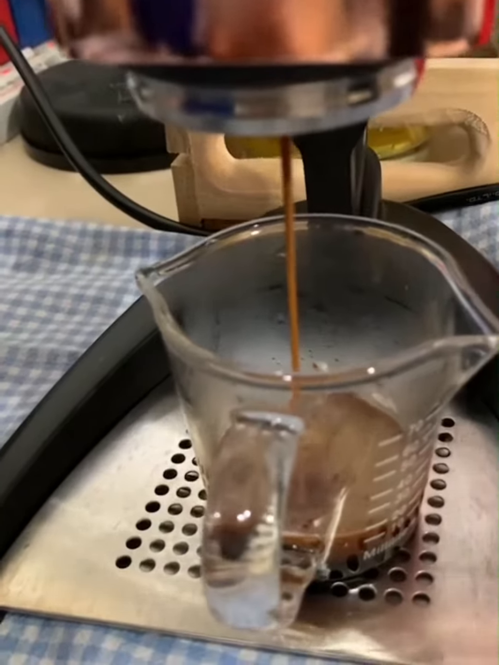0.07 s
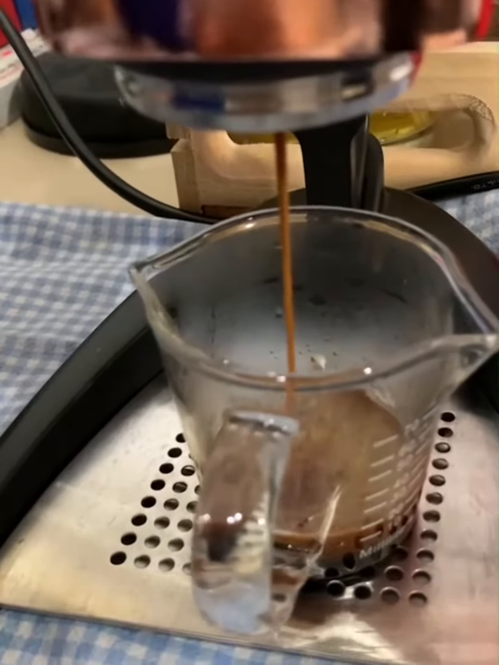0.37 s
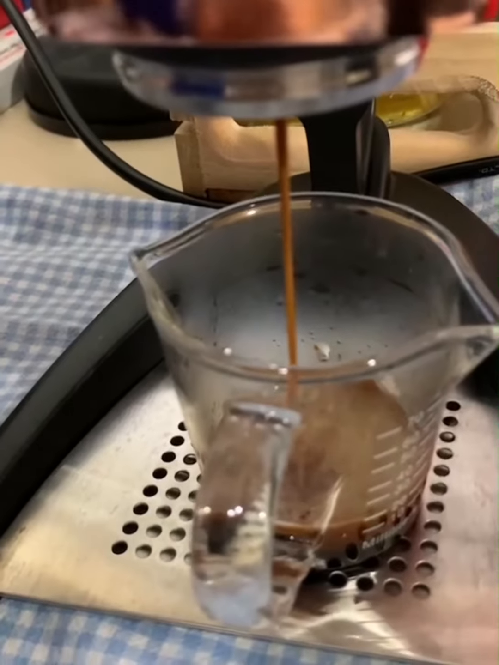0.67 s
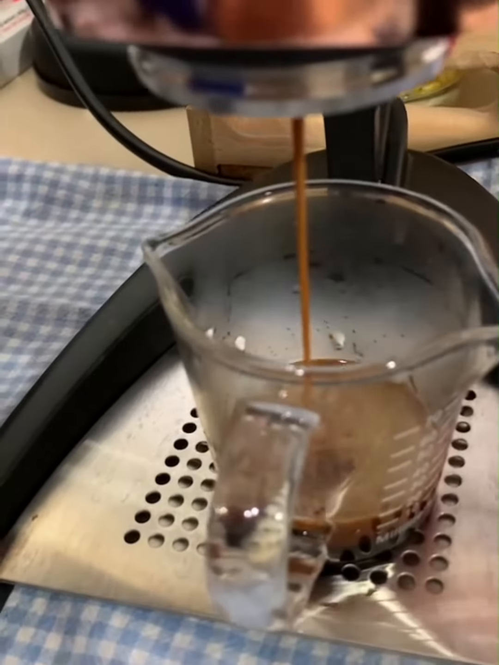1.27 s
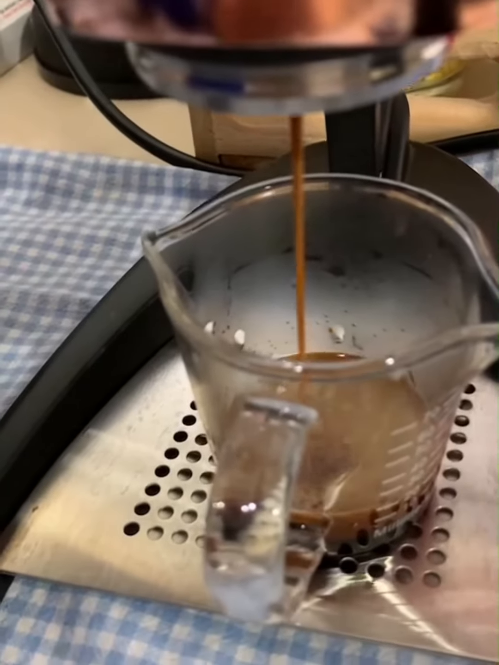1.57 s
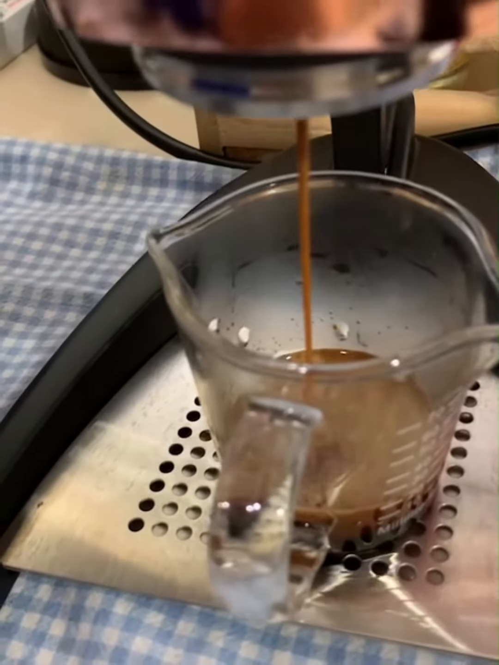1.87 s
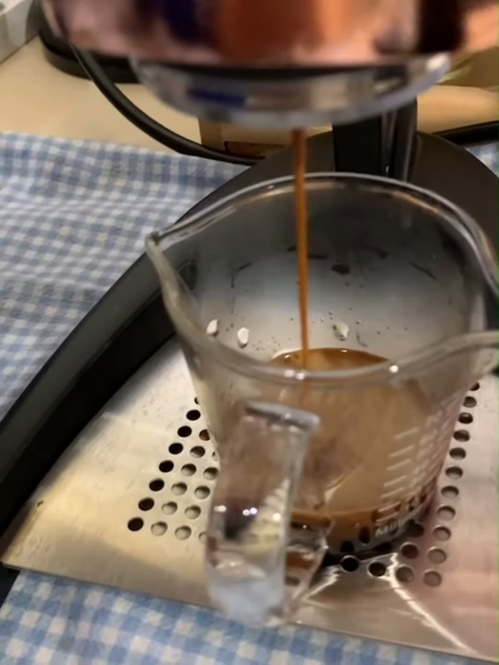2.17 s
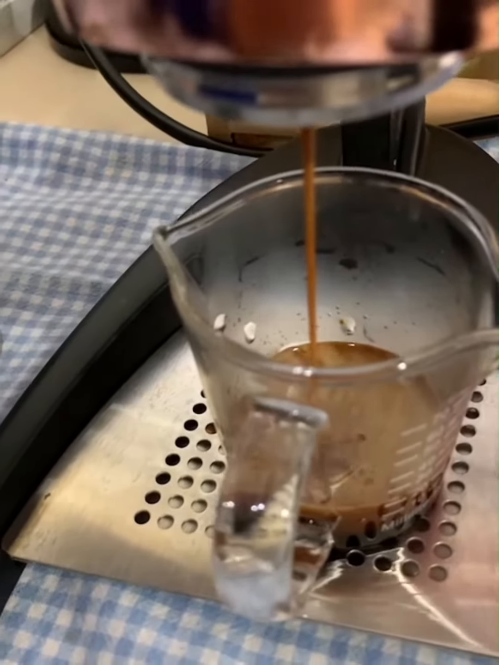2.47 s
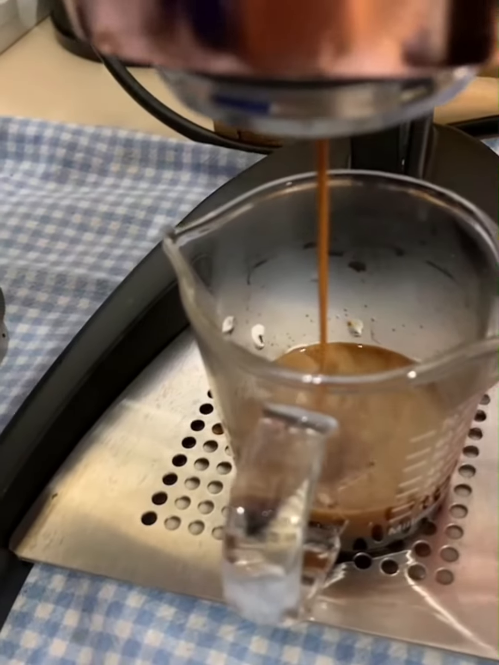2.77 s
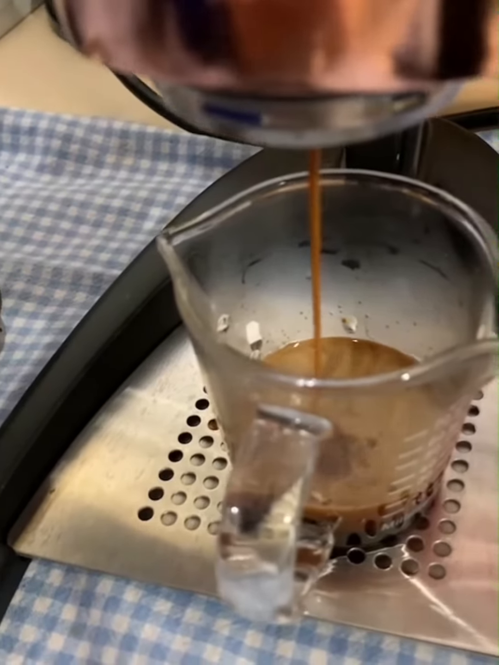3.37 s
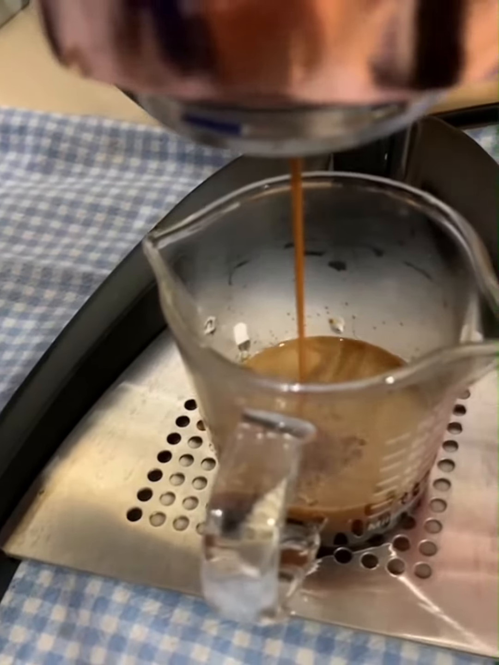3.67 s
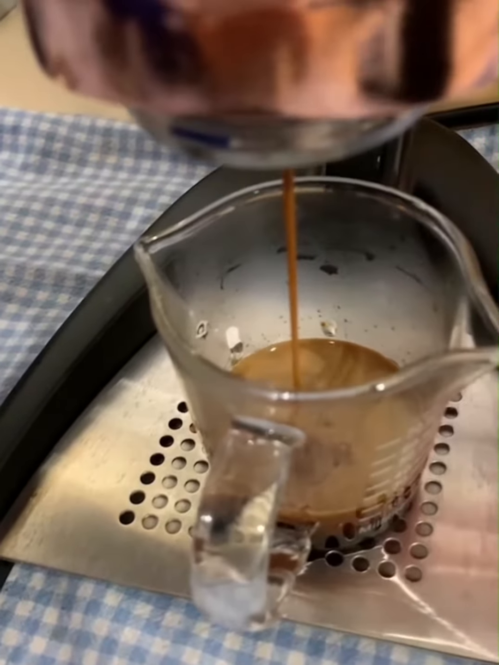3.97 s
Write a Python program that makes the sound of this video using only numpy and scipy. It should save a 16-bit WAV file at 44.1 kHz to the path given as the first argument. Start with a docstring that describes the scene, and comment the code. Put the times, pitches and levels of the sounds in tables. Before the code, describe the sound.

Coffee trickles into a glass jug close by for the whole four seconds. Droplets land unevenly as bright ticks with brief glassy rings and soft hollow pats, with fine spatter between. Sharper ticks come around 0.6, 1 and 3.6 seconds, and a few small bubbles ring, clearest near 2.7 seconds. The jug's tone shifts slightly as it fills. Low room rumble and appliance hum continue underneath.

```python
"""A quiet room, close to an espresso machine: a thin stream of coffee falls into a glass jug.
Each droplet lands with a bright tick, a brief ring of the glass and a softer pat that sounds the air
in the jug, whose tone shifts as it fills. Fine spatter and a few ringing bubbles lie between the ticks.
Behind them are the room's low rumble and the hum of appliances."""
import sys
import numpy as np
from scipy import signal
from scipy.fft import rfft, irfft
from scipy.io import wavfile

SR = 44100
rng = np.random.default_rng(int(sys.argv[2]) if len(sys.argv) > 2 else 0)


def inscribe(sig):
    """Save sig as 16-bit PCM at rate SR to the path in sys.argv[1].

    A 1-D sig is mono; a 2-D sig holds one channel per row.
    Samples are clipped to [-1, 1] before scaling.
    """
    pcm = np.round(np.clip(np.atleast_2d(sig).T, -1, 1) * 32767)
    wavfile.write(sys.argv[1], SR, pcm.astype(np.int16))


N = 176400
TIME_S = np.arange(N) / SR
SIDES = np.array([[1], [-1]])   # left, right
IMPACT_S = .002   # swell before each impact
FILL_STAGES_S = (.42, 1.7, 4.45)   # early, midway, late

FINE_RING_DB = -7   # relative to the tick
# start_s, tick_db, ring_db, pat_db
DROPLETS = [(0.0115, -38, -47, -35), (0.0238, -45, -50, -35), (0.0438, -41, -45, -34),
            (0.0596, -38, -51, -40), (0.0833, -37, -40, -36), (0.1169, -38, -44, -36),
            (0.1324, -36, -50, -43), (0.2159, -43, -53, -37), (0.2576, -44, -59, -41),
            (0.2637, -47, -49, -38), (0.3636, -40, -55, -39), (0.4439, -43, -48, -35),
            (0.4511, -52, -53, -39), (0.457, -47, -65, -38), (0.5057, -42, -59, -43),
            (0.5165, -49, -58, -43), (0.5733, -42, -38, -48), (0.5891, -35, -66, -45),
            (0.5971, -38, -48, -41), (0.6198, -40, -55, -51), (0.6387, -32, -55, -43),
            (0.6528, -43, -54, -42), (0.6723, -42, -44, -48), (0.74, -40, -48, -40),
            (0.9122, -38, -46, -38), (0.9187, -39, -49, -45), (0.9473, -49, -54, -44),
            (0.96, -42, -46, -51), (0.9759, -29, -33, -37), (0.9911, -36, -34, -43),
            (1.0035, -41, -57, -43), (1.0335, -38, -44, -42), (1.0612, -49, -51, -39),
            (1.1254, -39, -39, -47), (1.1348, -51, -39, -38), (1.1773, -36, -46, -56),
            (1.1918, -43, -55, -43), (1.2014, -36, -38, -47), (1.2954, -37, -34, -48),
            (1.3077, -43, -53, -41), (1.3234, -44, -44, -42), (1.3424, -34, -41, -45),
            (1.353, -44, -60, -43), (1.3837, -44, -55, -47), (1.4451, -46, -50, -39),
            (1.4533, -48, -43, -48), (1.4638, -42, -56, -47), (1.484, -44, -53, -42),
            (1.4903, -41, -47, -37), (1.4987, -38, -39, -37), (1.5094, -41, -62, -45),
            (1.5196, -51, -55, -41), (1.6016, -46, -44, -46), (1.6456, -46, -39, -45),
            (1.6576, -38, -40, -39), (1.8987, -39, -61, -44), (1.9242, -56, -56, -43),
            (1.9323, -44, -45, -53), (1.9468, -40, -47, -41), (1.9777, -38, -59, -59),
            (1.9981, -52, -58, -38), (2.019, -46, -50, -39), (2.1381, -51, -46, -37),
            (2.1801, -38, -60, -54), (2.2065, -40, -39, -42), (2.2638, -50, -48, -42),
            (2.2738, -51, -58, -40), (2.284, -38, -52, -54), (2.3245, -48, -49, -41),
            (2.4288, -43, -55, -47), (2.4925, -35, -45, -41), (2.5052, -46, -49, -43),
            (2.5672, -62, -62, -40), (2.6286, -48, -44, -46), (2.6372, -53, -52, -36),
            (2.6461, -38, -54, -38), (2.6664, -36, -46, -45), (2.6847, -43, -45, -36),
            (2.7008, -40, -47, -45), (2.723, -47, -57, -45), (2.773, -43, -56, -39),
            (2.8585, -37, -51, -39), (2.8907, -42, -57, -40), (2.9407, -43, -65, -50),
            (2.9953, -57, -58, -42), (3.1239, -44, -60, -44), (3.1374, -45, -65, -46),
            (3.2624, -41, -53, -41), (3.2735, -38, -46, -47), (3.2857, -42, -49, -37),
            (3.3912, -43, -52, -39), (3.4287, -41, -54, -46), (3.4444, -49, -61, -44),
            (3.4829, -54, -58, -42), (3.5218, -40, -57, -40), (3.5444, -40, -61, -45),
            (3.5531, -43, -57, -39), (3.561, -32, -56, -39), (3.5813, -30, -48, -43),
            (3.5974, -42, -67, -51), (3.6096, -44, -60, -41), (3.6942, -42, -53, -39),
            (3.7076, -41, -53, -40), (3.7496, -43, -52, -48), (3.9898, -37, -53, -41)]
def stream():
    """Main droplets, spatter and patter each land with a tick and a pat."""
    fine_s, fine_tick_db, fine_pat_db = np.hstack([spatter(DROPLETS), patter()])
    fine = [fine_s, fine_tick_db, fine_tick_db + FINE_RING_DB, fine_pat_db]
    start_s, tick_db, ring_db, pat_db = np.hstack([np.transpose(DROPLETS), fine])
    return ticks(start_s, tick_db, ring_db) + pats(start_s, pat_db)


TICK_GAIN_DB, GLASS_GAIN_DB, TICK_WET_DB, TICK_SPREAD = 23, 38.5, -17, .25
TICK_ATTACK_S, TICK_DECAY_S, POP_GAIN = .0004, .0019, .2
# pitch_hz, width_hz, early_db, midway_db, late_db
TICK_MODES = [(2860, 323, 2.5, 2.5, -3), (5800, 610, 4.5, -6, -6.5), (6220, 830, 6.5, 6, -2.5),
              (7075, 630, 8.5, 6.5, 6), (7390, 550, 5, 4.5, 4.5), (8700, 460, 1, 4.5, 5),
              (9250, 950, -2.5, 1, 4.5), (12550, 1270, -1, 0, 2.5), (14400, 580, -5, -1.5, -41)]
# pitch_hz, width_hz, level_db
GLASS_MODES = [(4082, 118, 0), (4400, 105, 0.5)]
def ticks(start_s, tick_db, ring_db):
    """Snaps and pops at the surface excite bright resonances and the glass wall."""
    def ring(pulses):
        surface = sum((-1) ** k * strike(start_s, tick_db + TICK_GAIN_DB, pulses, hz, width_hz, fill_db)
                      for k, (hz, width_hz, *fill_db) in enumerate(TICK_MODES))
        glass = sum(strike(start_s, ring_db + GLASS_GAIN_DB, pulses, hz, width_hz, [db] * 3)
                    for hz, width_hz, db in GLASS_MODES)
        return surface + glass

    count = len(start_s)
    impacts = splashes(count, TICK_ATTACK_S, TICK_DECAY_S, snap=.9)
    scatter = splashes(count, TICK_ATTACK_S, TICK_DECAY_S, snap=0)
    centre = ring(impacts + POP_GAIN * pops(count))
    direct = two_ears(centre) + TICK_SPREAD * two_ears(ring(scatter)) * SIDES
    echo_band = from_db(3) * resonate(direct, hz=6800, width_hz=650)
    return direct + from_db(TICK_WET_DB) * reverb(direct + echo_band)


PAT_GAIN_DB, JUG_WET_DB, JUG_SPREAD = 25.5, -7, .25
PAT_ATTACK_S, PAT_DECAY_S = .0016, .0025
# pitch_hz, width_hz, early_db, midway_db, late_db, pan_left_db
JUG_AIR_MODES = [(505, 330, 1.5, 3.5, -10, -4.5), (760, 166, -35, 0, 14, 0), (901.4, 66, 7, 17, 17, -1.5),
                 (1118, 37, 18.5, 12, -13, 1.5), (1472, 156, 10.5, 7.5, -2, 1),
                 (2146, 195, -5, 8, 12.5, -4.5), (2460, 630, 0, 4, 1, 0)]
def pats(start_s, pat_db):
    """The air in the jug answers each splash with a hollow note."""
    impacts = splashes(len(start_s), PAT_ATTACK_S, PAT_DECAY_S, snap=.92)
    scatter = splashes(len(start_s), PAT_ATTACK_S, PAT_DECAY_S, snap=0)
    direct = 0
    for k, (hz, width_hz, *fill_db, pan_left_db) in enumerate(JUG_AIR_MODES):
        centre = strike(start_s, pat_db + PAT_GAIN_DB, impacts, hz, width_hz, fill_db)
        side = strike(start_s, pat_db + PAT_GAIN_DB, scatter, hz, width_hz, fill_db)
        mode = two_ears(centre) + JUG_SPREAD * side * SIDES
        direct += (-1) ** k * mode * from_db(SIDES * pan_left_db / 2)
    return direct + from_db(JUG_WET_DB) * reverb(direct)


def splashes(count, attack_s, decay_s, snap, size=600):
    """One row per droplet: noise swells to an impulse of weight snap, then dies."""
    t = TIME_S[:size] - IMPACT_S
    envelope = np.exp(np.minimum(t / attack_s, -t / decay_s))
    pulses = unit_energy(rng.standard_normal((count, size)) * envelope)
    pulses[:, np.argmin(abs(t))] += snap
    return unit_energy(pulses)


def pops(count, centre_hz=6700, spread_octaves=.74, decay_cycles=1.5, size=600):
    """One row per droplet: a tiny bubble bursts and rings for a few cycles."""
    t = np.maximum(TIME_S[:size] - IMPACT_S, 0)
    hz = centre_hz * 2 ** (spread_octaves * rng.standard_normal((count, 1)))
    return unit_energy(np.sin(2 * np.pi * hz * t) * np.exp(-t * hz / decay_cycles))


def strike(start_s, level_db, pulses, hz, width_hz, fill_db, scatter_db=3):
    """Droplets drive one resonance unevenly; its strength shifts as the jug fills."""
    mode_db = np.interp(start_s, FILL_STAGES_S, fill_db)
    gains = from_db(level_db + mode_db + scatter_db * rng.standard_normal(len(start_s)))
    onsets = (np.maximum(start_s - IMPACT_S, 0) * SR).astype(int)
    samples = onsets[:, None] + np.arange(pulses.shape[1])
    drive = np.bincount(samples.ravel(), (gains[:, None] * pulses).ravel(), N)[:N]
    return resonate(drive, hz, width_hz)


FINE_SPREAD_DB = 9.5
def spatter(droplets, per_drop=2, lag_s=.0051, within_s=.023, follow=.5):
    """Fine drops round each main droplet partly follow its level: start_s, tick_db, pat_db."""
    start_s, tick_db, _, pat_db = np.repeat(droplets, per_drop, axis=0).T
    timing, size = rng.uniform(-1, 1, (len(start_s), 2)).T
    return [start_s + lag_s + within_s * timing,
            -60 + follow * (tick_db - tick_db.mean()) + FINE_SPREAD_DB * size,
            -56 + follow * (pat_db - pat_db.mean()) + FINE_SPREAD_DB * size]


# time_s, level_db
PATTER_STRENGTH = [(0, -5), (.33, -7.5), (.6, 1), (.83, -12.5), (1.1, -2), (1.5, -2), (2.7, -2.5),
                   (3.07, -8), (3.45, -2.5), (3.68, 3), (3.83, -17), (4, -1.5)]
def patter(rate_per_s=200, count=1200):
    """The stream's continuous finest drops: start_s, tick_db, pat_db."""
    start_s = (np.arange(count) + rng.random(count)) / rate_per_s
    level_db = np.interp(start_s, *np.transpose(PATTER_STRENGTH))
    level_db += FINE_SPREAD_DB * rng.uniform(-1, 1, count)
    return np.array([start_s, level_db - 66, level_db - 55.5])[:, start_s < N / SR]


# start_s, level_db, pitch_hz
BUBBLES = [(0.023, -32, 1150), (.045, -37, 1144), (.364, -40, 490), (.445, -34, 1130), (1.228, -37, 493),
           (1.489, -32, 2350), (2.138, -36, 2310), (2.275, -31, 2520), (2.636, -33.5, 863.5),
           (2.684, -26.5, 2396), (2.859, -34, 2290), (3.538, -31, 835)]
def bubbles(attack_s=.00089, t60_cycles=59, rise_per_s=2.95):
    """Trapped air rings briefly, rising a little in pitch."""
    rings, t = np.zeros(N), TIME_S[:3000]
    for start_s, level_db, hz in BUBBLES:
        envelope = (1 - np.exp(-t / attack_s)) * from_db(level_db - 60 * t * hz / t60_cycles)
        phase = 2 * np.pi * hz * (t + rise_per_s * t * t / 2)
        add(rings, start_s, envelope * np.sin(phase))
    direct = two_ears(rings)
    return direct + from_db(JUG_WET_DB) * reverb(direct)


# freq_hz, lag_rad
RIGHT_LAG = [(0, 0), (900, .3), (2200, .8), (2500, 3), (3800, 2), (6800, 6.28), (15200, 18.85)]
def two_ears(x):
    """The sound reaches the right ear later."""
    lag_rad = np.interp(BIN_HZ, *np.transpose(RIGHT_LAG))
    return np.array([x, irfft(rfft(x) * np.exp(-1j * lag_rad), N)])


def reverb(x, t60_s=.2, onset_s=.00033):
    """Dense reflections from the machine and the room, different on each side."""
    t = TIME_S[:16000]
    envelope = from_db(-60 * t / t60_s) * (1 - np.exp(-t / onset_s))
    tail = unit_energy(rng.standard_normal((2, len(t))) * envelope)
    return signal.fftconvolve(x, tail, axes=1)[:, :N]


BIN_HZ = np.arange(N // 2 + 1) * SR / N
# freq_hz, density_db
RUMBLE_SPECTRUM = [(25, -18), (38, -8), (52, -3.5), (80, 0.5), (108, -0.5), (125, -6), (165, -1.5),
                   (200, -4), (255, -8), (320, -8.5), (385, -17), (430, -12.5), (520, -21.5), (620, -22.5),
                   (900, -23), (1400, -30), (2200, -41), (3200, -44.5), (5000, -65.5), (8000, -60),
                   (15000, -62)]
# freq_hz, correlation
EAR_CORRELATION = [(60, .999), (170, .995), (320, .92), (600, .55), (1500, .4), (5000, .1)]
def room_rumble(level_db=-38.5):
    """Steady low noise, nearly the same at both ears in the bass."""
    mid, side = rfft(rng.standard_normal((2, N))) * from_db(at_hz(RUMBLE_SPECTRUM, BIN_HZ))
    correlation = at_hz(EAR_CORRELATION, BIN_HZ)
    spectrum = np.sqrt(1 + correlation) * mid + np.sqrt(1 - correlation) * side * SIDES
    return from_db(level_db) * unit_rms(irfft(spectrum, N))


# pitch_hz, level_db, width_hz
HUM_BANDS = [(63.4, -50, 2.1), (77.5, -51.5, 18), (135.4, -55.5, 14.6), (199.3, -47.5, 11.4),
             (315, -49.5, 14.8), (346.6, -54.5, 9.1), (517, -60.5, 4), (1586, -66.5, 7)]
def appliance_hum():
    """Appliances hum in narrow, wavering bands of noise."""
    hum = np.zeros(N)
    for hz, level_db, width_hz in HUM_BANDS:
        band = rfft(rng.standard_normal(N)) / (1 + ((BIN_HZ - hz) / width_hz) ** 2)
        hum += from_db(level_db) * unit_rms(irfft(band, N))
    return hum


def resonate(x, hz, width_hz):
    """Two-pole resonance, unity peak gain."""
    r = np.exp(-np.pi * width_hz / SR)
    zeros = np.array([1, 0, -1]) * (1 - r * r) / 2
    poles = [1, -2 * r * np.cos(2 * np.pi * hz / SR), r * r]
    return signal.lfilter(zeros, poles, x + 1e-18)


def from_db(db):
    return 10 ** (np.asarray(db) / 20)


def unit_rms(x):
    return x / np.sqrt(np.mean(x ** 2) + 1e-20)


def unit_energy(rows):
    return rows / np.linalg.norm(rows, axis=1, keepdims=True)


def at_hz(table, hz):
    """Interpolate on a log-frequency axis."""
    freq_hz, values = np.transpose(table)
    return np.interp(np.log(np.maximum(hz, 1)), np.log(freq_hz), values)


def add(out, start_s, sound):
    i = int(start_s * SR)
    out[i:i + len(sound)] += sound[:N - i]


def scene():
    """The trickle in front of the room."""
    return stream() + bubbles() + room_rumble() + appliance_hum()


CUTOFF_HZ = 16000
def record(dry):
    """Steep low-pass."""
    return signal.sosfilt(signal.ellip(10, .3, 80, CUTOFF_HZ, fs=SR, output="sos"), dry)


dry = scene()
out = record(dry)
inscribe(out)
```